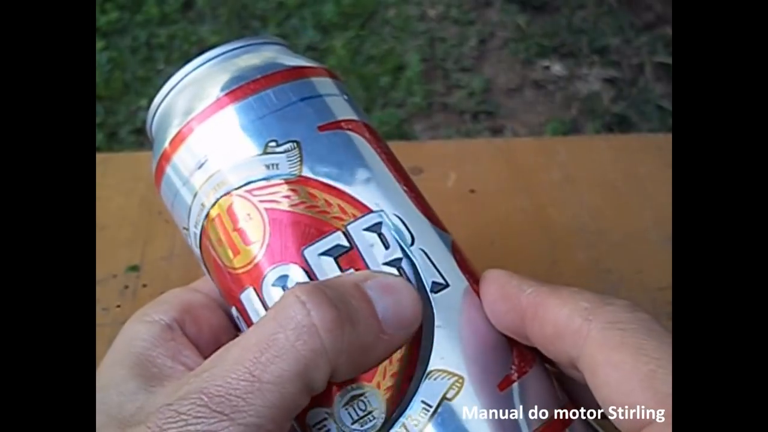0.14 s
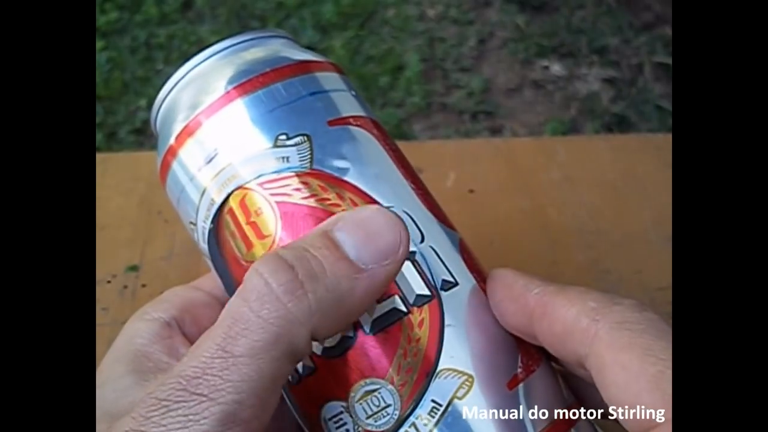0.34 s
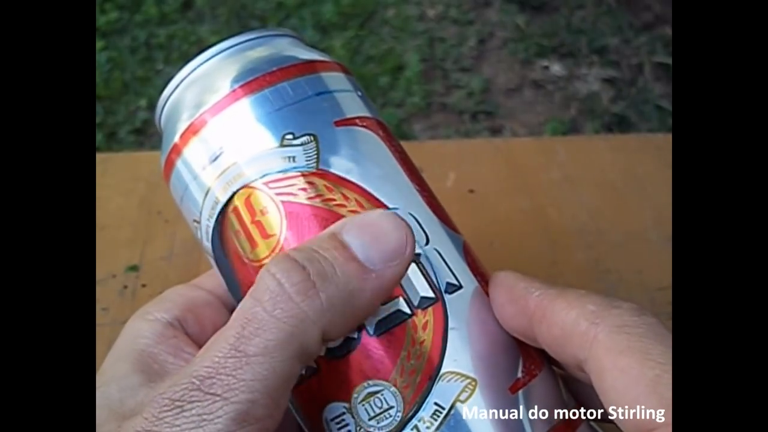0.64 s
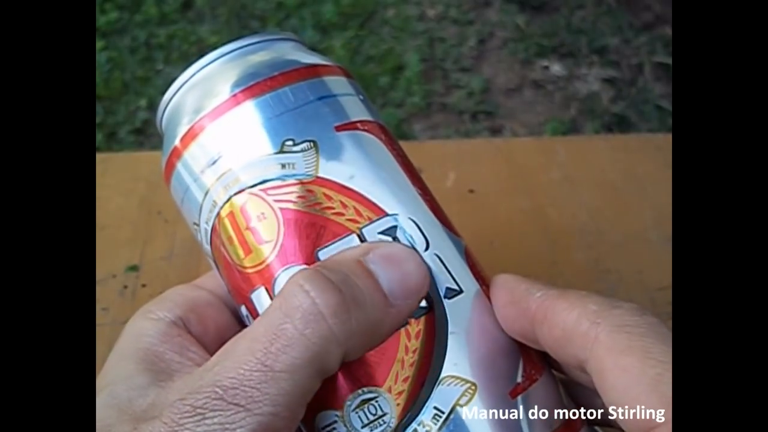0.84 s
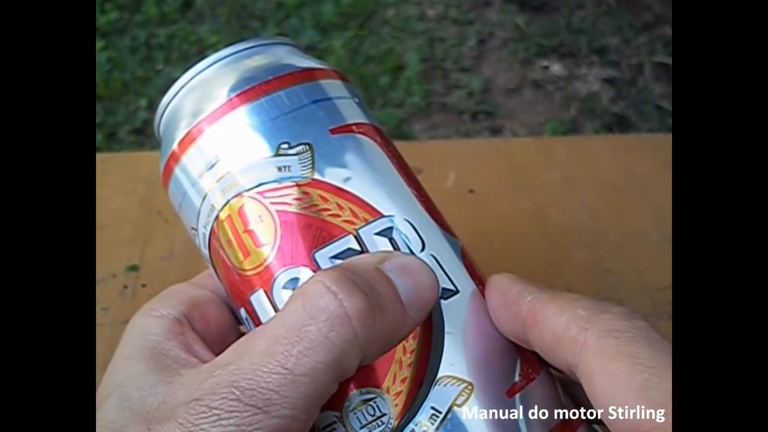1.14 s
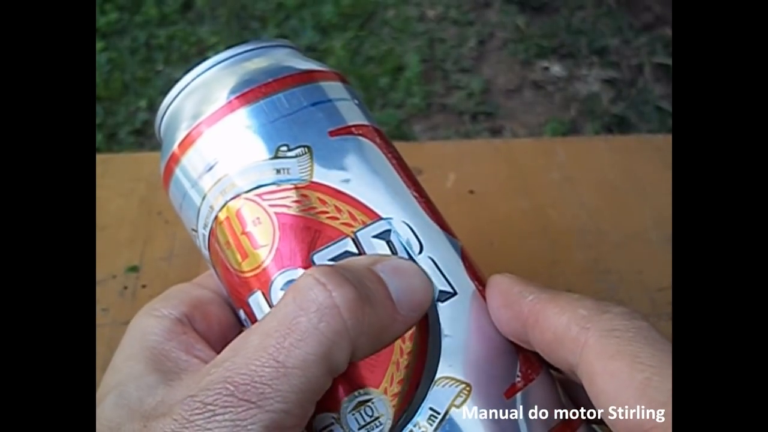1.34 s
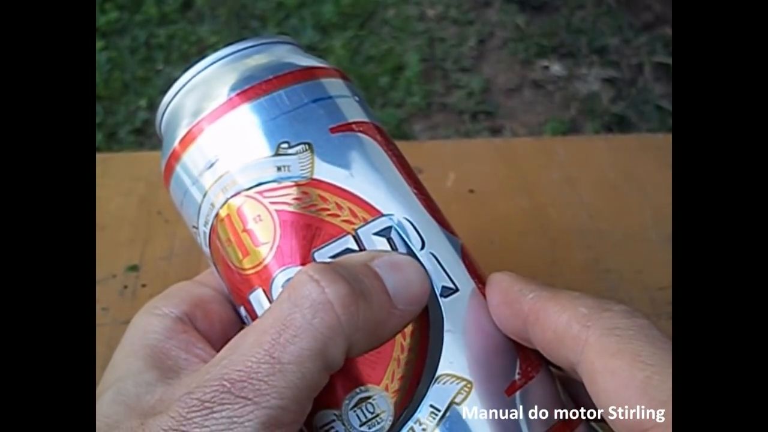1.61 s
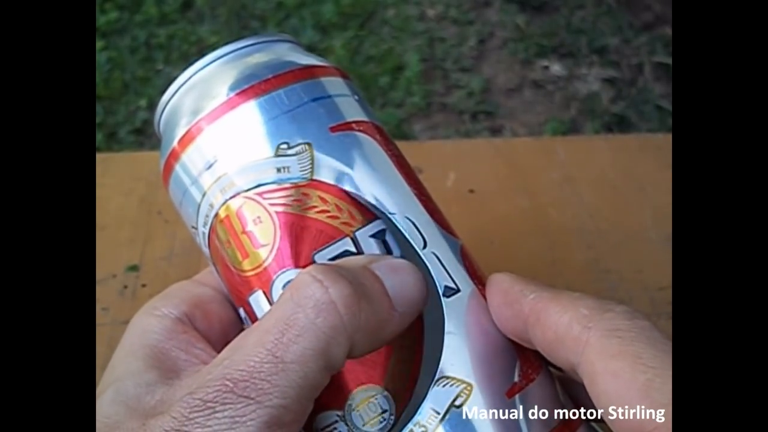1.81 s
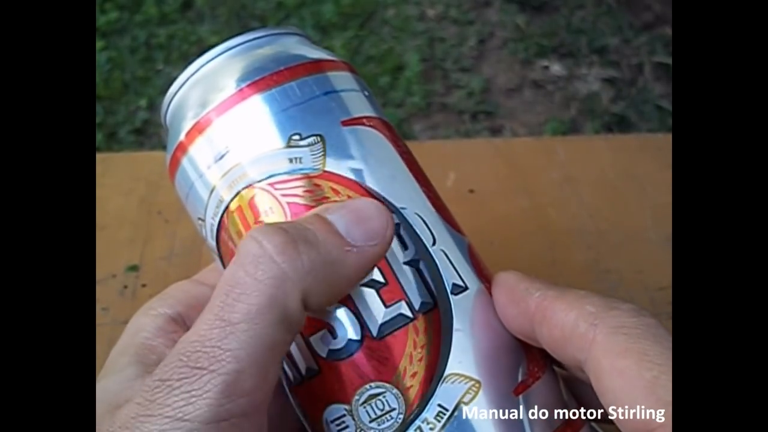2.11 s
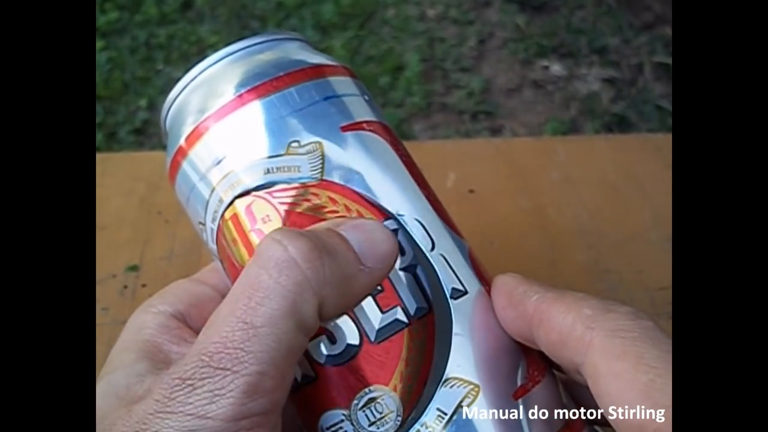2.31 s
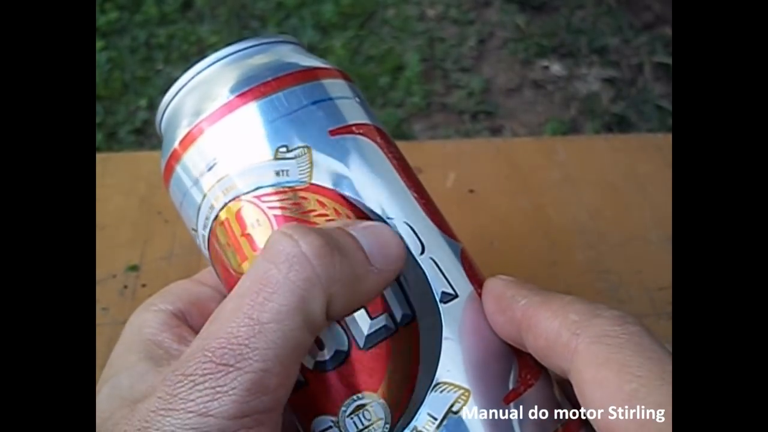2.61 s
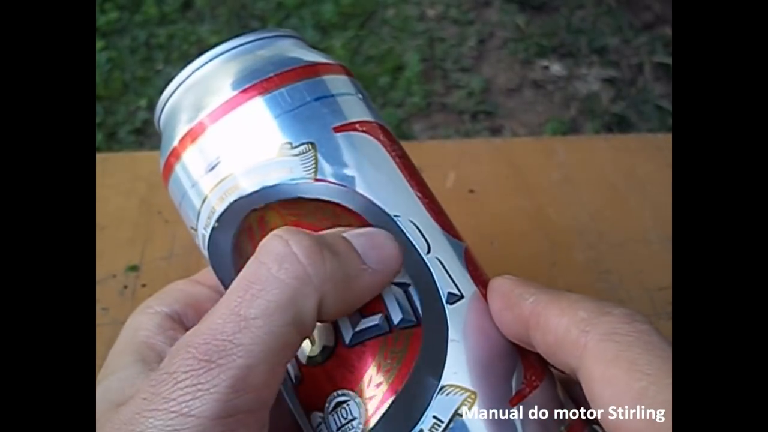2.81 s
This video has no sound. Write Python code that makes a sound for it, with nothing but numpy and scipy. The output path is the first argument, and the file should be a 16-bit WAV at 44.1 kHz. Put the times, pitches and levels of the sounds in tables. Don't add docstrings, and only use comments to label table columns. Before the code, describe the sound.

Fingers bend a thin metal drinks can, its wall snapping and popping irregularly over faint rumble

```python
import sys
import numpy as np
from scipy import signal
from scipy.fft import rfft, irfft
from scipy.io import wavfile
from scipy.ndimage import uniform_filter1d

SR = 44100
rng = np.random.default_rng(int(sys.argv[2]) if len(sys.argv) > 2 else 0)


def file_out(sig):
    cols = np.atleast_2d(sig).T
    lim = np.clip(cols, -1, 1)
    pcm = np.round(lim * 32767).astype(np.int16)
    wavfile.write(sys.argv[1], SR, pcm)


def attenuation_scalar(level_db):
    decades = np.asarray(level_db, float) / 20
    return 10 ** decades


N = 130095

BUCKLE_S = 0.00031
DETUNE, MODE_SPREAD_DB, PHASE_SCATTER = 0.016, 4, 0.13
EVENT_SAMPLES = 4000


def evened(x):
    return x / np.sqrt(np.mean(x ** 2) + 1e-20)


def add(mix, start_s, sound):
    part = mix[max(round(start_s * SR), 0):][:len(sound)]
    part += sound[:len(part)]


def ring(modes, t60, bent):
    hz, db = np.transpose(modes)[:, :, None]
    bend, spread, phase = rng.standard_normal((len(modes), 3, 1)).transpose(1, 0, 2)
    t = np.arange(EVENT_SAMPLES) / SR
    level = attenuation_scalar(db + MODE_SPREAD_DB * spread)
    bent_hz = hz * (1 + DETUNE * bent * bend)
    waves = level * np.sin(2 * np.pi * (bent_hz * t + PHASE_SCATTER * phase / (2 * np.pi) * 2 * np.pi))
    onset = (1 - np.exp(-t / BUCKLE_S)) ** 2
    return waves.sum(0) / np.linalg.norm(level) * onset * attenuation_scalar(-60 * t / t60)


# pitch in Hz, level in dB.
LOW_MODES = [(680, -12), (820, -12.5), (968, 4.5), (1175, -0.5), (1300, -5.5), (1430, -14)]
MIDDLE_MODES = [(1665, -0.5), (1785, 5), (1915, -3), (1975, 5.5), (2090, -3), (2300, -2.5), (2480, -16.5)]
HIGH_MODES = [(2600, -4.5), (2800, -1), (3050, -14.5), (3270, -5), (3670, -5.5), (3980, -18), (4290, -3.5),
              (4720, -11.5), (5040, -6.5), (5560, 4), (5750, -7.5)]
# the time to fade by 60 dB in seconds,
# how far a dent bends its notes in units of DETUNE, and its extra level in dB.
FAMILY_T60 = [0.03, 0.027, 0.03]
FAMILY_BEND = [.9, .9, 3.5]
FAMILY_DB = [1.5, 1, 0]
THUD_HZ, THUD_DB, THUD_T60 = 376, -16, 0.016
LINGER_DB, LINGER_T60 = -32, 0.11


def shell(low_db, middle_db, high_db, share=0.76):
    levels = attenuation_scalar(low_db + np.array([0, middle_db, high_db]) + FAMILY_DB)
    thud = [(THUD_HZ * ratio, 0) for ratio in (.55, .8, 1.15)]
    out = levels[0] * attenuation_scalar(THUD_DB) * ring(thud, THUD_T60, 3.1)
    shares = np.clip(share, .1, [4, 4, 2])
    families = (LOW_MODES, MIDDLE_MODES, HIGH_MODES + HIGH_MODES)
    for level, modes, t60, bent in zip(levels, families, FAMILY_T60 * shares, FAMILY_BEND):
        struck = ring(modes, t60, bent)
        tail = attenuation_scalar(LINGER_DB) * ring(modes, LINGER_T60, bent)
        out = out + level * (struck + tail)
    return out


# start in seconds,
# low notes in dB, middle and high notes in dB relative to the low, ring length as a share of normal.
WALL_SNAPS = [(0.046, -37.5, -13, -8, 0.52), (0.063, -43.5, -7, -7.5, 1.3), (0.075, -49, 1, 3.5, 2.1),
              (0.0897, -30.5, -9.5, -6, 0.51), (0.1758, -55.5, 4, 7.5, 2.8),
              (0.2103, -32.5, -2.5, -10, 1.02), (0.2483, -31, 9, -7, 0.94), (0.2546, -26, 3, 9, 1.6),
              (0.2673, -15.5, -4, 3.5, 0.33), (0.274, -21, -8, -3.5, 0.67), (0.2807, -33, 17, 5, 0.64),
              (0.286, -34, 1, -1, 0.43), (0.2896, -27, 11.5, 10, 0.93), (0.3, -26.5, 1, -7, 0.55),
              (0.3076, -15.5, 2.5, -4, 0.77), (0.317, -36.5, 5, -10.5, 0.88),
              (0.405, -40, 2.5, -10.5, 1.12), (0.445, -50.5, 2.5, 2.5, 1.27), (0.578, -54, 4.5, 3, 3.1),
              (0.597, -22.5, -5, -14.5, 1.37), (0.605, -22, -3.5, -10, 0.67), (0.822, -33, 0, -9.5, 1.07),
              (0.858, -47.5, -3.5, -2, 2.2), (0.947, -40, -3, -3, 1.14),
              (0.9629, -23, 1, -12, 0.86), (0.97, -23, -7, -11.5, 1.01), (1.577, -29, -0.5, 13.5, 0.61),
                (1.5851, -31, 9.5, 15, 0.58), (1.596, -32.5, 0, -3.5, 0.74), (1.609, -43, -12, -8, 1.4),
                (1.62, -27, 12.5, 8, 0.82), (1.6268, -29.5, 10.5, 11.5, 0.35),
                (1.9111, -11.5, 4, 9.5, 0.78), (1.9134, -25, -4, 0.5, 1.2), (1.946, -35, 8, 2, 0.66),
                (1.9515, -20.5, 1, 7, 2.1), (1.96, -21.5, 3.5, 4, 1.04), (2.0856, -18, -2, 1.5, 0.94),
                (2.09, -28.5, 6, -0.5, 0.91), (2.164, -50.5, 4, 2, 2.2), (2.3, -46, 1, -4, 1.6),
                (2.331, -39, 6, -2, 0.96), (2.336, -40, 4.5, -14, 1.25), (2.388, -25, -12, -22, 1.37),
                (2.414, -39.5, 0, -7, 1.15),
              (2.575, -44.5, -4.5, -12, 1), (2.606, -26, -12.5, -20, 1.18), (2.617, -28.5, -8, -8, 0.53),
            (2.667, -45.5, 4, 5, 1.2), (2.701, -45, -2, -6, 1.59), (2.707, -43, -12, -9, 1.4),
            (2.723, -46.5, 10.5, 4.5, 0.99), (2.7782, -28, -2.5, -7, 0.88), (2.8387, -28.5, 4.5, 8, 1.8),
            (2.8497, -20.5, -0.5, 1.5, 0.63), (2.8617, -18.5, -4, 2, 0.96), (2.873, -28, 0, 0.5, 0.89),
            (2.8775, -29, 2.5, -1.5, 1.8), (2.8856, -11.5, 5.5, 7, 0.67), (2.8883, -8, 0.5, 4.5, 0.8),
            (2.8931, -18.5, -6, 2.5, 0.24), (2.898, -22, 2, -5.5, 1.3)]


def snaps():
    out = np.zeros(N)
    for start_s, *levels in WALL_SNAPS:
        add(out, start_s, shell(*levels))
    return out


def pop(hz, db, t60):
    t = np.arange(EVENT_SAMPLES) / SR
    return attenuation_scalar(db - 60 * t / t60) * np.sin(2 * np.pi * hz * t) * (1 - np.exp(-t / BUCKLE_S))


# start in seconds, pitch in Hz, level in dB, time to fade by 60 dB in seconds.
DENT_POPS = [(.2568, 1940, -10, 0.015), (.2677, 1960, -6, 0.01), (.2741, 1970, -7, 0.0053),
             (.2812, 2050, -31, .015), (.2914, 1960, -6, 0.0066), (.3079, 2140, -10.5, 0.015),
             (0.3093, 1840, -19, 0.011), (0.3177, 2020, -38.5, 0.0216), (1.577, 2066, -18.5, 0.03),
             (1.5856, 1964, -17.5, 0.016), (1.6248, 1120, -7.5, 0.01), (1.627, 1100, -26, 0.021),
             (1.9113, 1010, -17, 0.042), (1.912, 1238, -17, 0.034), (1.9424, 1902, -19.5, 0.039),
             (1.9587, 990, -20.5, .03), (2.0851, 962, -9.5, 0.032), (2.0856, 1176, -8, 0.027),
             (2.0853, 835, -23, 0.057), (2.388, 776, -29, 0.033), (2.3885, 608, -31.5, 0.039),
             (2.8425, 1120, -14.5, 0.041), (2.8517, 1233, -11.5, 0.027), (2.861, 2280, -8.5, 0.017),
             (2.8628, 1152, -16, 0.048), (2.8682, 1224, -11.5, 0.027), (2.8851, 1437, -10, 0.058),
             (2.8858, 1650, -15, 0.048), (2.891, 2810, -5, 0.016), (2.886, 380, -26, 0.034)]


def pops():
    out = np.zeros(N)
    for start_s, *note in DENT_POPS:
        add(out, start_s, pop(*note))
    return out


SLIPS_PER_S, SLIP_SPREAD_DB = 1500, 3
CREAK_EDGE = .12


def creak(length_s, low_db, middle_db, high_db):
    draw = rng.random((4000, 2))
    at_s = np.arange(len(draw)) / SLIPS_PER_S + draw[:, 1] / SLIPS_PER_S
    u = np.clip(at_s / length_s, 0, 1)
    swell = np.clip(np.minimum(u, 1 - u) / CREAK_EDGE, 0, 1)
    size = swell * attenuation_scalar(-SLIP_SPREAD_DB * np.log(1 - draw[:, 0]))
    sign = np.sign(np.sin(at_s * 1e6))
    samples = round(length_s * SR)
    out, spots = np.zeros(samples + 4100), 3
    for k in range(spots):
        slips = np.zeros(samples + 2)
        live = (u < 1) & (np.arange(len(u)) % spots == k)
        slips[(at_s[live] * SR).astype(int)] = size[live] * sign[live]
        add(out, 0, signal.fftconvolve(slips, shell(low_db - 7.5, middle_db, high_db)))
    return out


# start in seconds, length in seconds, low notes in dB,
# middle and high notes in dB relative to the low.
EDGE_CREAKS = [(0.074, 0.029, -53, 2, -22), (0.244, 0.0144, -31, 1, 3), (0.268, 0.054, -33, -6, -10),
               (0.72, 0.15, -60, -6, -26), (0.431, 0.034, -56.5, -29, -1.5), (1.244, 0.13, -65, -3, -22),
               (1.611, 0.009, -49, 13.5, 0), (1.9377, .031, -28.5, 0, 3.5), (2.58, 0.02, -49.5, -8.5, -8),
               (2.841, 0.016, -31.5, 1.5, 5), (2.859, 0.023, -29, 7, 4), (2.882, 0.089, -45.5, -8, 0)]


def creaks():
    out = np.zeros(N)
    for start_s, *rest in EDGE_CREAKS:
        add(out, start_s, creak(*rest))
    return out


def chirp(length_s, start_hz, end_hz, db):
    u = np.arange(round(length_s * SR)) / (length_s * SR)
    turns = np.cumsum(start_hz + (end_hz - start_hz) * u) / SR
    return attenuation_scalar(db) * np.sin(np.pi * u) * np.sin(2 * np.pi * turns)


# start in seconds, length in seconds,
# first pitch in Hz, last pitch in Hz, level in dB.
FAR_NOTES = [
    (1.735, .05, 3300, 3300, -67),
    (2.525, .045, 4100, 3550, -70),
    (1.29, .08, 1230, 1270, -65),
    (1.265, .1, 1920, 1900, -66),
    (1.3, .07, 1680, 1650, -68),
    (.72, .08, 1650, 1900, -67),
]


def far_notes():
    out = np.zeros(N)
    for start_s, *note in FAR_NOTES:
        add(out, start_s, chirp(*note))
    return out


# pitch in Hz, level in dB.
MOTOR_TONES = [(43.5, -47), (149.5, -47)]
# centre in Hz, width in Hz, level in dB.
MOTOR_BANDS = [(17.5, 3.5, -45), (75.3, 13, -49), (139, 27, -56.5)]
WAVER_HZ = 1.548


def hum():
    hz, t = np.fft.rfftfreq(N, 1 / SR), np.arange(N) / SR
    drift = uniform_filter1d(rng.standard_normal(N), size=6000)
    waver = evened(uniform_filter1d(drift, size=6000))
    motor_time = t + np.cumsum(waver) / SR * WAVER_HZ / 150
    out = np.zeros(N)
    for f, db in MOTOR_TONES:
        out += attenuation_scalar(db) * np.sqrt(2) * np.sin(2 * np.pi * f * motor_time)
    for f, width, db in MOTOR_BANDS:
        resonance = 1 / (1 + (2 * (hz - f) / width) ** 2)
        out += attenuation_scalar(db) * evened(irfft(rfft(rng.standard_normal(N)) * resonance, N))
    return out


def coloured(points):
    hz = np.fft.rfftfreq(N, 1 / SR)
    f, db = np.transpose(points)
    shape = attenuation_scalar(np.interp(np.log(hz + 1), np.log(f + 1), db, left=-200, right=-200))
    return evened(irfft(rfft(rng.standard_normal(N)) * shape, N))


# frequency in Hz, level in dB per Hz.
RUMBLE_COLOUR = [(8.8, -30), (15, 0), (43, 5), (113, -4.5), (151, 0), (240, -29), (310, -65), (530, -120)]
RUMBLE_DB = -39.5


def rumble():
    return attenuation_scalar(RUMBLE_DB) * coloured(RUMBLE_COLOUR)


# centre in seconds, width in seconds, change in dB.
GUST_CHANGES = [
    (.36, .06, -13),
    (1.66, .03, -7.5),
    (1.86, .05, -2.5),
    (2.47, .06, 0),
]


def gusts():
    t = np.arange(N) / SR
    return attenuation_scalar(sum(db * np.exp(-((t - s) / width) ** 2) for s, width, db in GUST_CHANGES))


# frequency in Hz, level in dB per Hz.
AIR_COLOUR = [(130, -0.5), (220, -4.5), (527, -17), (1530, -20.5), (1650, -23), (1790, -21), (2480, -26),
              (3290, -26.5), (5480, -28.5), (7120, -71.5), (12100, -120)]
AIR_DB = -56


def air():
    return attenuation_scalar(AIR_DB) * coloured(AIR_COLOUR)


def scene():
    background = air() + gusts() * (rumble() + hum()) + far_notes()
    can = snaps() + pops() + creaks()
    return np.tile(background + can, (2, 1))


DUCK_FROM_DB, DUCK_SHARE, RECOVER_DB_PER_S = -25.5, 0.09, 38


def gain_control(x):
    power_db = 10 * np.log10(abs(uniform_filter1d(x ** 2, size=2500)) + 1e-12)
    fall = np.arange(N) * RECOVER_DB_PER_S / SR
    held_db = np.maximum.accumulate(power_db + fall) - fall
    over_db = np.maximum(held_db - DUCK_FROM_DB, 0)
    return x / attenuation_scalar(DUCK_SHARE * uniform_filter1d(over_db, size=400))


# time in seconds, reach in Hz, level in dB.
HIGH_CLICKS = [
    (.268, 6900, -21),
    (.293, 7100, -21),
    (1.623, 6600, -23),
    (2.0846, 11000, -44),
    (2.8467, 7000, -28),
    (2.8497, 7300, -25),
    (2.867, 7400, -24),
    (2.8699, 8400, -23),
    (2.876, 6900, -26),
]


def high_clicks(hz):
    out = 0
    for s, reach_hz, db in HIGH_CLICKS:
        click = np.exp(-2j * np.pi * hz * s - (hz / reach_hz) ** 8)
        out = out + attenuation_scalar(db) * click * (hz > EDGE_HZ)
    return out


EDGE_HZ, CEILING = 5850, .54
SPLATTER_DB = -10
LEFT_LAG, LAG_EASES_BELOW_HZ = 3.65, 220


def roll_off(x):
    return signal.sosfilt(signal.butter(12, 15700, fs=SR, output="sos"), x)


def record(dry):
    hz = np.fft.rfftfreq(2 * N, 1 / SR)
    band = rfft(gain_control(dry[0]), 2 * N) / (1 + (hz / EDGE_HZ) ** 70)
    band = band + high_clicks(hz)
    lag_s = LEFT_LAG / SR * (.42 + .58 / (1 + (LAG_EASES_BELOW_HZ / (hz + 1)) ** 6))
    late = np.array([[1], [0]])
    pair = irfft(band * np.exp(-2j * np.pi * hz * lag_s * late))[:, :N]
    clipping = rfft(np.clip(pair, -CEILING, CEILING) - pair, 2 * N)
    clipping = clipping * np.where(hz > EDGE_HZ, attenuation_scalar(SPLATTER_DB), 1)
    return roll_off(pair + irfft(clipping)[:, :N])


dry = scene()
out = record(dry)
file_out(out)
```